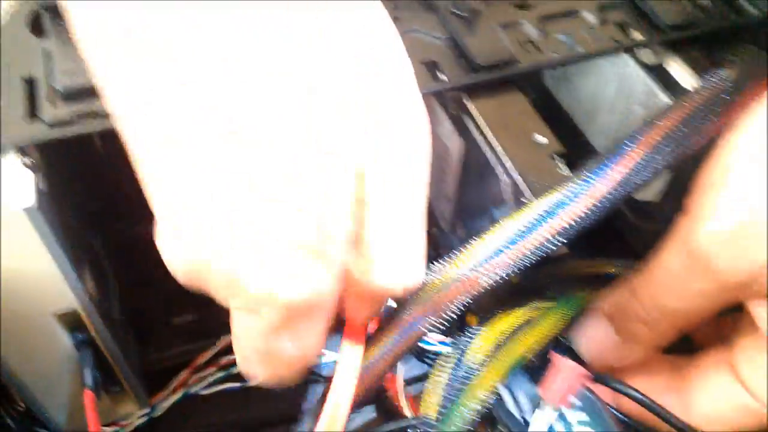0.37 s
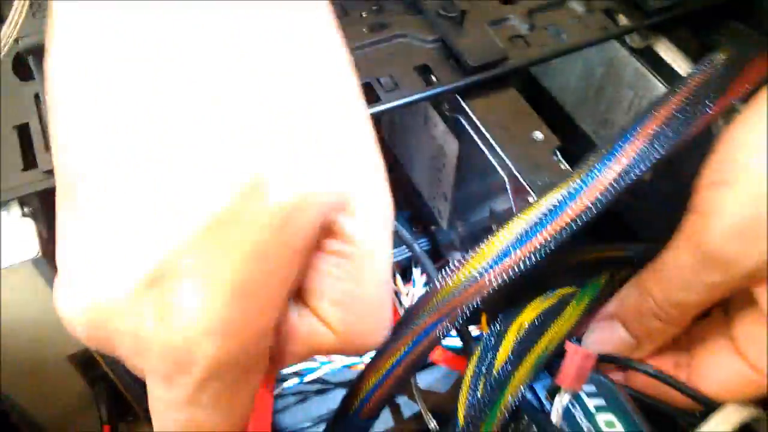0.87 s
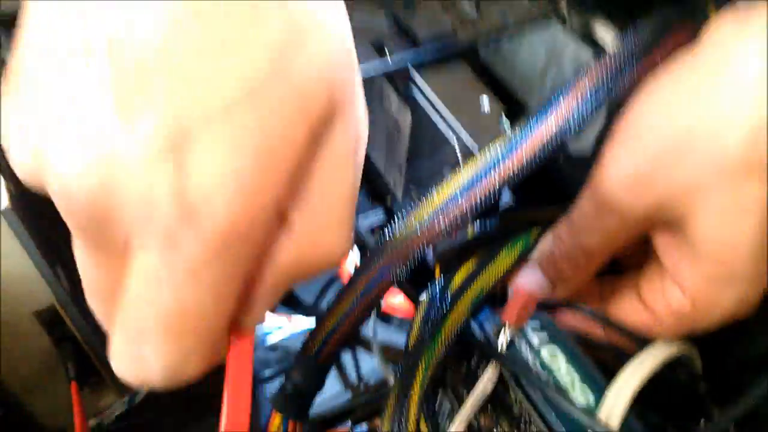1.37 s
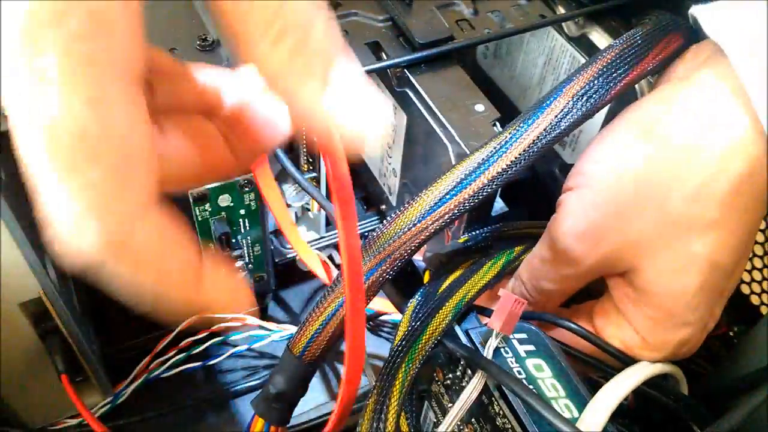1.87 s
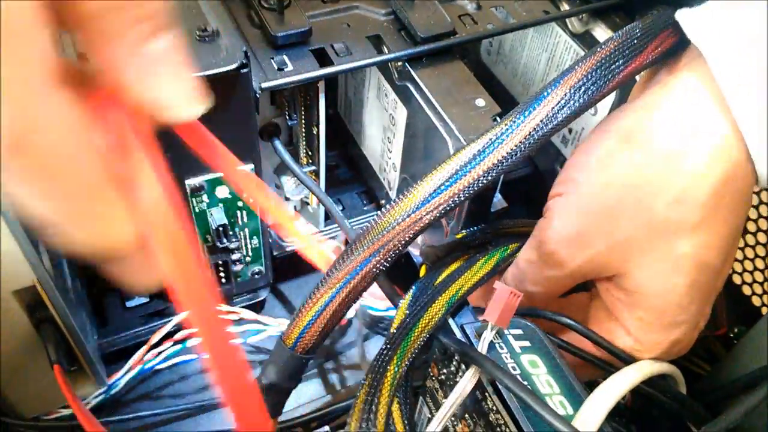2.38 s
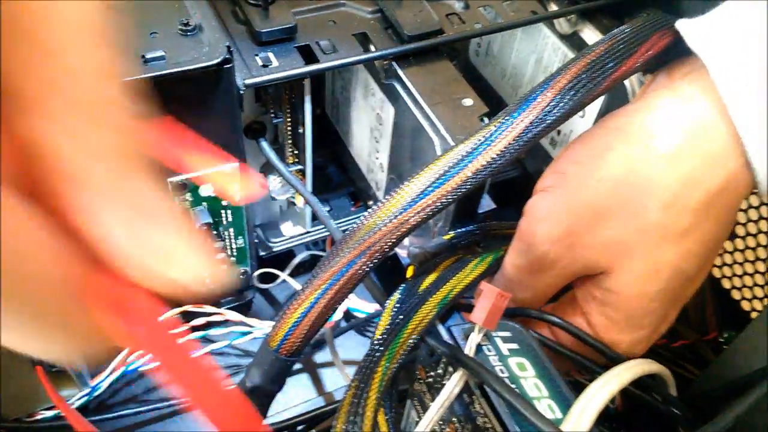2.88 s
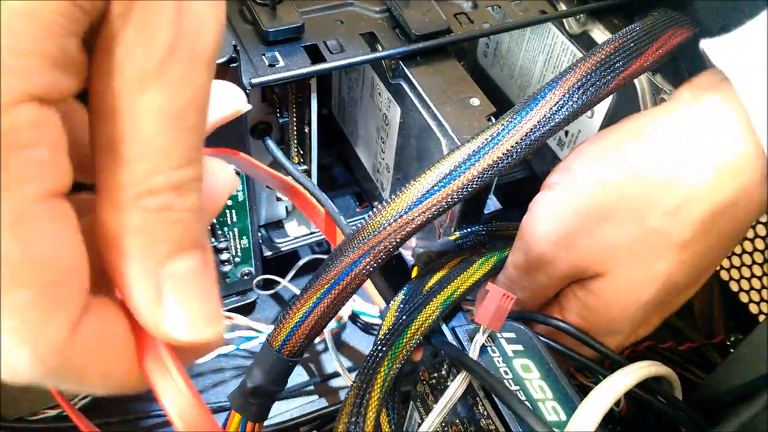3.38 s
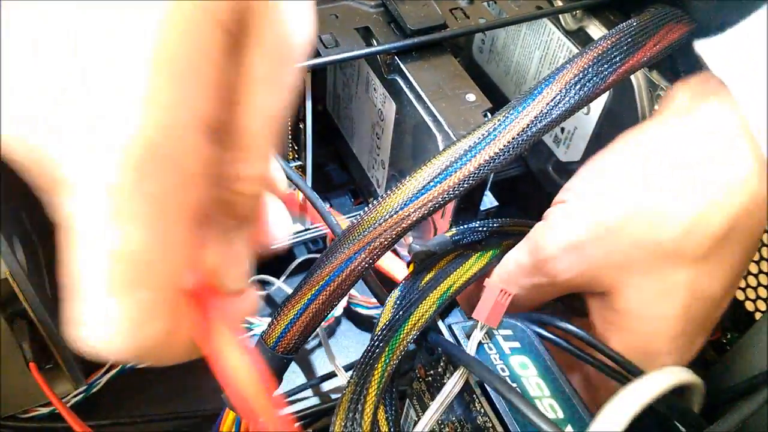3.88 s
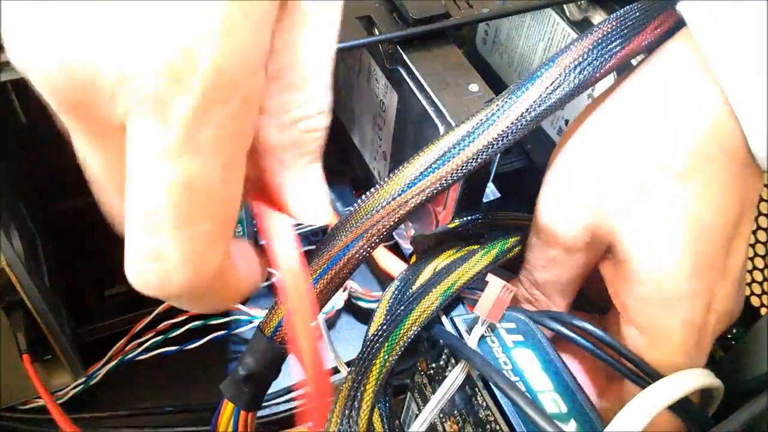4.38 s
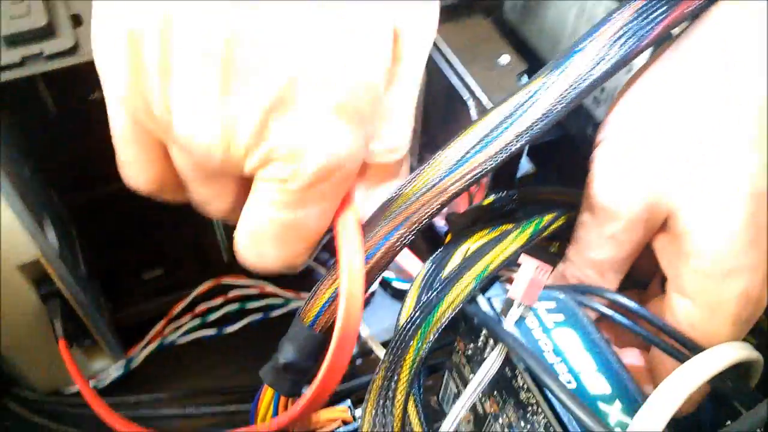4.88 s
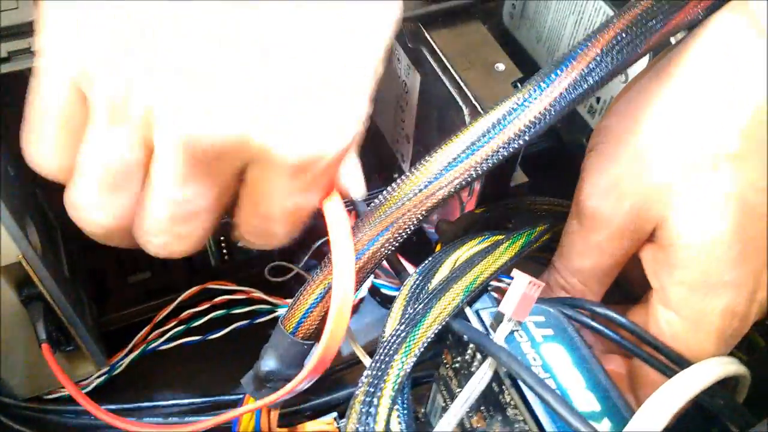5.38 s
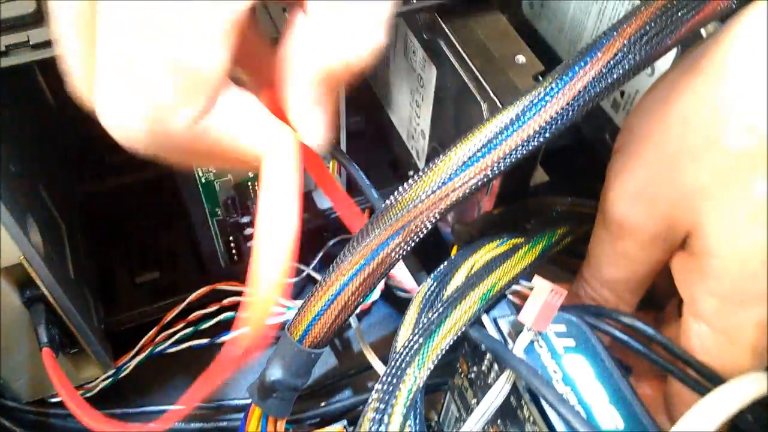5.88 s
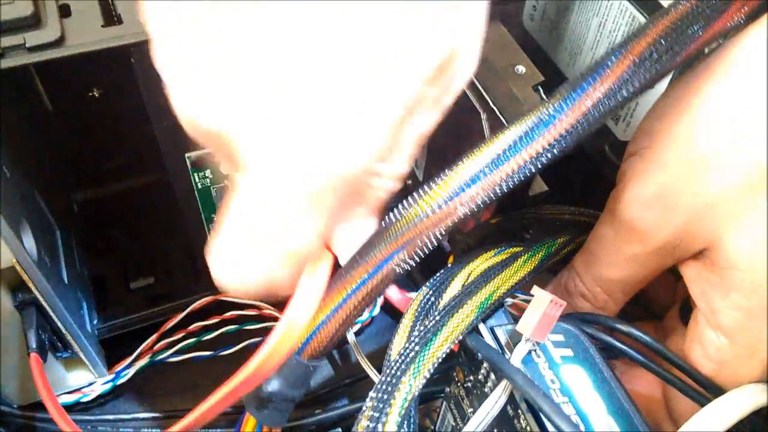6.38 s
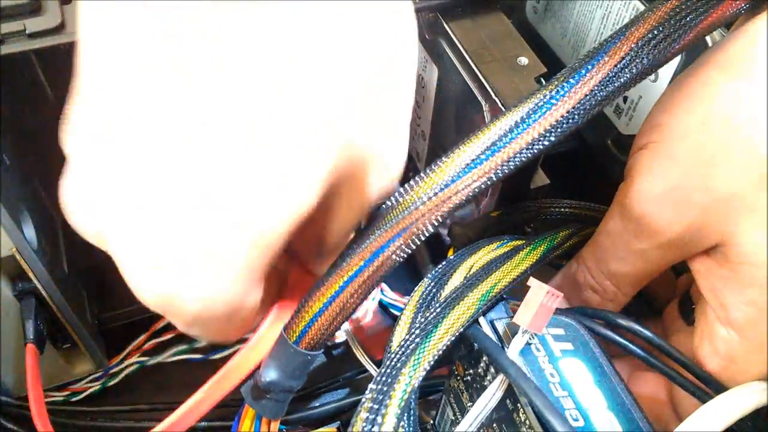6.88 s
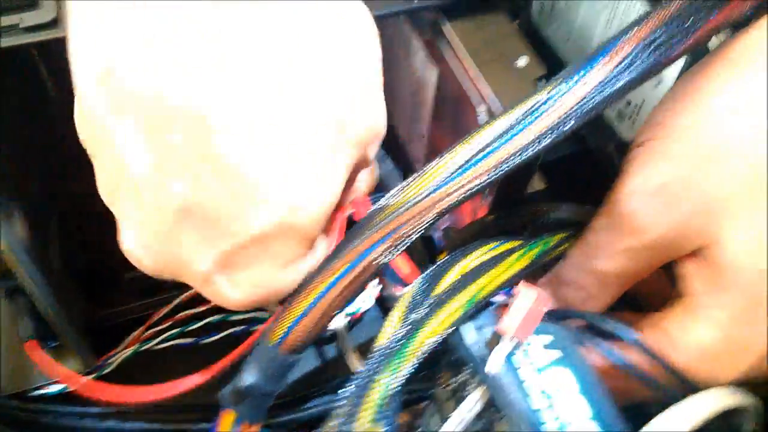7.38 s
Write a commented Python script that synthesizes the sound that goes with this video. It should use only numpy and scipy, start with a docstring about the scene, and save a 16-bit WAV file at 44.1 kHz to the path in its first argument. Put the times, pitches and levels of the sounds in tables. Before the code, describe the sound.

Cable connectors knock against sheet-metal panels in irregular bursts, each a bright click with a brief rattling ring. Woven cable sleeves brush and drag between them. Strong clacks come early in the middle, then nearly nothing but quiet ticks, rising again to a violent cluster just before the end. Dry, close indoor sound with faint hiss; the hardest hits also bump the small microphone.

```python
"""Plastic plugs tap and chatter on the panels of an open sheet-metal computer case, close to a small camera.
Each tap is a burst of noisy micro-slips that rings the panels and also jolts the camera, the harder ones far
more. Stiff cables drag over edges as clumped noise heard through the case, and sleeves brush on each other
throughout. Underneath lie a quiet room hiss of shaped noise and three thin electrical tones made of unsteady
sines."""
import sys
import numpy as np
from scipy import signal
from scipy.fft import rfft, irfft, next_fast_len
from scipy.io import wavfile
from scipy.ndimage import uniform_filter1d, map_coordinates

SR = 44100
rng = np.random.default_rng(int(sys.argv[2]) if len(sys.argv) > 2 else 0)


def ratio_of_db(decibels):
    """Turn decibels (scalar or array-like) into linear amplitude factors; 0 dB maps to 1."""
    return 10 ** (np.asarray(decibels, float) / 20)


def master_out(mix):
    """Clip the mix to full scale and print it as 16-bit PCM to the path in sys.argv[1]."""
    frames = np.transpose(np.atleast_2d(mix))
    ceiling = np.clip(frames, -1, 1)
    pcm = np.round(ceiling * 32767).astype(np.int16)
    wavfile.write(sys.argv[1], SR, pcm)


N = 330750  # 7.5 s

# Plug contacts. Each row: time in seconds, level in dB, brightest pitch in Hz, relative low knock in dB.
CONTACTS = [(.0593,-21,4360,-21),(.1426,-26,3430,-18),(.3696,-38,4000,-20),(.4105,-35,2370,-15),(.4185,-34,4060,-23),(.5916,-39,3900,-17),(.712,-47,1450,-5),(.839,-37.5,2780,-22),(.8845,-22,3850,-16),
            (1.1074,-32.5,2000,-17),(1.154,-34,4100,-28),(1.2165,-25,3980,-24),(1.241,-30,4000,-21),(1.3387,-34,2020,-20),(1.501,-41,3850,-16),(1.6785,-11.5,3900,-23),
            (1.783,-23,5540,-33),(1.7986,-24,5100,-33),(1.8325,-19,2580,-31),(2.022,-48,6500,-25),(2.0598,-46,4160,-11),(2.2205,-4.5,6040,-30),(2.3466,-23,3020,-24.5),
            (2.4105,-24,3920,-17),(2.4415,-7,2740,-32),(2.4495,-5,2670,-30.5),(2.4615,-7.5,5500,-36),(2.5245,-23,3020,-27),(2.6705,-21,3730,-30.5),(2.9415,-34,2000,-21),
            (3.102,-48,880,0),(3.172,-43,1970,-12),(3.19,-41,1570,-18),(3.2854,-50,2160,-9),(3.3475,-42,2390,-24),(3.473,-46,5940,-19),(3.585,-46,1580,-16),(3.82,-53,2500,-12),(4.0776,-51,4020,-20),
            (4.3256,-37.5,1840,-14),(4.473,-48,2750,-16),(4.552,-41,2600,-22),(4.580,-27.5,4800,-27),(4.611,-33,2540,-26),(4.6363,-25,2710,-25),(4.75,-38,4550,-21),(4.963,-48,2200,-18),(5.1776,-47,1650,-19),
            (5.3265,-28,2580,-26),(5.46,-43,3730,-17),(5.5446,-28,4210,-35),(5.5855,-33,6220,-27),(5.5946,-26,5700,-26),(5.6299,-26,3900,-19),(5.6428,-19,4440,-26),
            (5.772,-36,4500,-24),(5.984,-35,2050,-10),(6.022,-36,3960,-13),(6.0472,-35,3940,-15),(6.0693,-28,4000,-20),(6.08,-22,6200,-24),(6.0895,-20,3900,-21),(6.143,-31,1950,-10),(6.424,-35,6000,-22),
            (6.547,-34,6500,-12),(6.562,-33,2000,-10),(6.7676,-33,3850,-18),(6.9135,-11,3740,-23),(6.9328,-3,1630,-14),(6.9454,-4,5000,-24),(6.9534,-6,3800,-24),
            (7.232,-39,4500,-20),(7.393,-44,1860,-14),(7.4484,-44,4040,-20)]
# Hands on the sleeves. Each row: time in seconds, level in dB, crispness as relative treble in dB.
HANDLING = [(0, -44, -16), (.22, -52, -12), (.7, -56, -14), (1.5, -54, -15), (1.62, -66, -14),
            (2.4, -70, -14), (2.75, -62, -18), (3.1, -71, -17), (3.45, -64.5, -15), (3.65, -76, -15),
            (4.3, -73, -17), (4.75, -56, -16), (4.9, -66, -15.5), (5.1, -75.5, -14), (5.3, -59, -14),
            (5.6, -55, -7.5), (5.9, -54, -10), (6.9, -55, -8.5), (7.05, -60, -11), (7.5, -59, -11.5)]
# Broad resonances of the case. Each row: centre in Hz, width in Hz, relative level in dB.
PANEL_RESONANCES = [(830, 234, -2), (1650, 300, -7), (2050, 280, -5), (2600, 420, -5.5), (3900, 990, -4.5),
                    (5000, 605, -4.5), (5925, 700, -5.5), (8760, 3560, -18)]


def unit(x):
    """Scaled to rms 1."""
    return x / np.sqrt(np.mean(x ** 2) + 1e-20)


def along(points, hz):
    """Reads a curve of (Hz, value) points on a log frequency axis."""
    point_hz, values = np.transpose(points)
    return np.interp(np.log(hz + 1), np.log(point_hz + 1), values)


def curves(rows):
    """One value per sample for each column after the time in seconds."""
    times, *columns = np.transpose(rows)
    return [np.interp(np.arange(N) / SR, times, column) for column in columns]


def wobble(rate, size=N):
    """A smooth random curve with rate knots a second."""
    knots = rng.standard_normal(int(size * rate / SR) + 4)
    return map_coordinates(knots, [np.arange(size) * rate / SR])


def filtered(x, response):
    """Multiplies the spectrum of x by a complex response of frequency."""
    size = x.shape[-1]
    padded = next_fast_len(size + 4096)
    return irfft(rfft(x, padded) * response(np.fft.rfftfreq(padded, 1 / SR)), padded)[..., :size]


def ports(pair, alike):
    """Mixes two unrelated signals into left and right microphone signals, alike by a share set per frequency."""
    def mid_and_side(hz):
        turn = np.arccos(np.clip(along(alike, hz), -1, 1)) / 2
        return np.array([np.cos(turn), np.sin(turn)])

    mid, side = filtered(pair, mid_and_side)
    return np.array([mid + side, mid - side])


def resonances(table, hz):
    """Sum of resonators (centre Hz, width Hz, dB), every other one in opposite polarity."""
    return sum((-1) ** k * ratio_of_db(db) * 1j * hz * width / (centre * centre - hz * hz + 1j * hz * width)
               for k, (centre, width, db) in enumerate(table))


def background():
    """Room and electronics hiss as shaped noise, with three thin tones of slightly unsteady level and phase."""
    # Colour of the hiss. Each row: frequency in Hz, relative density in dB per Hz.
    hiss_colour = [(71, -66), (120, -26), (720, -1), (971, -11), (1030, -3.5), (1360, -8), (3400, -6),
                   (6300, -12), (7200, -18), (9980, -20), (13200, -26), (14000, -42.5)]
    # Electrical tones. Each row: frequency in Hz, peak level in dB.
    thin_tones = [(1066, -78), (10971, -94.5), (12947, -88)]
    t = np.arange(N) / SR
    hiss = unit(filtered(rng.standard_normal((2, N)), lambda hz: ratio_of_db(along(hiss_colour, hz))))
    wide_hiss = ports(hiss, [(200, .45), (1600, .1), (10000, .3)])  # (Hz, left-right likeness)
    tones = 0
    for hz, db in thin_tones:
        tones = tones + ratio_of_db(db + 1.3 * wobble(8.7)) * np.sin(2 * np.pi * hz * t + 0.89 * wobble(21))
    hiss_db = -66.5
    return ratio_of_db(hiss_db + 0.83 * wobble(1.3)) * wide_hiss + tones


def slips(size):
    """Woven sleeve catching and letting go: noise in clumps of several sizes, in patches of changing pitch."""
    clumps_db = 1.1 * wobble(35, size=size) + 1.5 * wobble(140, size=size) + 2.3 * wobble(900, size=size)
    spectra = signal.stft(ratio_of_db(clumps_db) * rng.standard_normal((2, size)), nperseg=256)[2]
    patches = rng.standard_normal(spectra.shape[1:])
    patches = uniform_filter1d(patches, size=6, axis=0)  # over frequency
    patches = uniform_filter1d(patches, size=10, axis=1)  # over time
    return unit(signal.istft(spectra * ratio_of_db(2.5 * unit(patches)), nperseg=256)[1][:, :size])


def settling():
    """Amplitude of the shifting cables after every tap: the power of the taps adds up and dies away."""
    under_tap_db, t60_s = -39, .55
    power = np.zeros(N)
    keep = ratio_of_db(-120 / t60_s / SR)  # share of power left after one sample
    for s, db, *_ in CONTACTS:
        power[round(s * SR)] = ratio_of_db(2 * (db + under_tap_db))
    return np.sqrt(signal.lfilter([1], [1, -keep], power))


def rubbing():
    """Sleeves and fingers brush on each other all the while, coloured by cloth and case; crispness sets the treble."""
    # Colour of the sleeves. Each row: frequency in Hz, relative density in dB per Hz.
    sleeve_colour = [(88, -49.5), (150, -20), (460, 2), (844, -5), (1140, -5.5), (1940, -2), (2950, -5.5),
                     (4000, -3), (6400, -11.5), (7300, -19), (12500, -28), (14000, -44.5)]
    level_db, treble_db = curves(HANDLING)
    brush = ratio_of_db(1.2 * wobble(10)) * slips(size=N)

    def colour(hz):
        return ratio_of_db(along(sleeve_colour, hz)) * (.6 + np.abs(resonances(PANEL_RESONANCES, hz)))

    # split at 7 kHz
    low = filtered(brush, lambda hz: colour(hz) / (1 + (hz / 7000) ** 8))
    high = filtered(brush, lambda hz: colour(hz) / (1 + (7000 / (hz + 1)) ** 8))
    return (ratio_of_db(level_db) + settling()) * (unit(low) + ratio_of_db(treble_db) * unit(high))


def treble(s, bright_hz):
    """Relative treble in dB of a contact: higher for small bright contacts and crisp handling."""
    base_db, db_per_octave, follows_crispness = -23, 5, 1.5  # base holds at 3.5 kHz and -14 dB crispness
    times, _, crisp_db = np.transpose(HANDLING)
    pitch_db = db_per_octave * np.log2(bright_hz / 3500)
    return base_db + pitch_db + follows_crispness * (np.interp(s, times, crisp_db) + 14)


def contact(bright_hz, knock_db, treble_db, modes_db=0):
    """The case from one point of contact: modes near the brightest pitch ring most, all at new strengths."""
    # Longest-ringing panel modes. Each row: centre in Hz, width in Hz, relative level in dB.
    long_modes = [(452, 16, -13), (880, 40, -11), (1221, 30, -10), (1630, 30, -8.5), (2010, 40, -8),
                  (2662, 40, -8), (3760, 50, -8), (4360, 50, -8), (5860, 60, -11)]
    chance_db = 3 * rng.standard_normal(len(long_modes))

    def near(hz):
        return np.exp(-(np.log((hz + 1) / bright_hz) / .15) ** 2)

    modes = [(centre, width, db - 2 + modes_db + luck_db + 6 * near(centre))
             for (centre, width, db), luck_db in zip(long_modes, chance_db)]
    broad = [(centre, width, db + 2.5 * rng.standard_normal()) for centre, width, db in PANEL_RESONANCES]
    tilt = [(100, knock_db - 4), (250, knock_db + 19), (900, knock_db + 18), (1600, -0.5), (6400, 0),
            (7500, treble_db + 18.5), (13000, treble_db + 19), (15500, -40)]  # (Hz, dB)

    def response(hz):
        body = resonances(broad, hz) * (1 + .8 * near(hz)) + 1.1 * resonances(modes, hz)
        return body * ratio_of_db(along(tilt, hz))

    return response


def strokes():
    """Cables dragged over edges: each rasp of slips swells and fades in dB and sounds through the case."""
    # Drags. Each row: strongest moment in seconds, rms level there in dB, seconds to swell by 20 dB,
    # seconds to fade by 20 dB, brightest pitch in Hz.
    drags = [(.068, -29, .09, 0.11, 4050), (.15, -36, .04, .06, 3600), (.4, -47, 0.23, 0.2, 4000),
             (.72, -48, .02, .15, 900), (.884, -39.5, 0.01, 0.11, 2500), (1.33, -46, 0.3, 0.25, 2000),
             (1.8, -29, 0.055, 0.03, 5530), (2.44, -27, 0.075, 0.0746, 3000), (2.68, -30, .004, .15, 4000),
             (2.835, -41, .05, 0.06, 4500), (3.84, -64, .03, .3, 4000), (4.1, -62, .05, .2, 3900),
             (4.415, -53, 0.1, 0.06, 6000), (4.6, -37, 0.03, 0.11, 5800), (5.28, -47, .09, 0.2, 3000),
             (5.335, -45, .006, .09, 452), (5.77, -41, 0.2, 0.1, 4400), (6.088, -32, 0.05, 0.07, 5800),
             (6.42, -46, .06, 0.12, 4240), (6.575, -41, .04, .06, 2000), (6.785, -45, .02, .2, 3900),
             (6.94, -19, 0.045, .05, 3000), (7.235, -44, 0.06, 0.1, 5000)]
    extra_treble_db, extra_modes_db = 4, 3.5  # over a tap; a drag keeps feeding the long modes
    lead = SR // 6  # samples ahead of the strongest moment
    out = np.zeros((2, N + SR))
    t = (np.arange(SR // 2) - lead) / SR
    for s, db, swell, fade, bright_hz in drags:
        treble_db = treble(s, bright_hz) + extra_treble_db
        # a duller drag presses on a larger area and moves the low modes more
        knock_db = -19 + 7 * np.log2(3000 / bright_hz)
        rasp = unit(filtered(slips(size=len(t)), contact(bright_hz, knock_db, treble_db, extra_modes_db)))
        envelope_db = db - 20 * np.where(t < 0, -t / swell, t / fade)
        out[:, round(s * SR):][:, :len(t)] += rasp * ratio_of_db(envelope_db)
    return out[:, lead:][:, :N]


def ring(size):
    """A fresh draw of the panels' dense modes as noise, each dying at the speed of its frequency."""
    # Decay of the dense modes. Each row: frequency in Hz, t60 in seconds.
    mode_decay = [(300, .5), (800, .4), (2000, .3), (5500, .2), (11000, .1)]
    hz, t, spectra = signal.stft(rng.standard_normal((2, size)), SR, nperseg=128)
    decay = ratio_of_db(-60 * t / along(mode_decay, hz)[:, None])
    tail = signal.istft(spectra * decay, SR, nperseg=128)[1][:, :size]
    return tail / np.linalg.norm(tail[0])


def taps():
    """Each contact is a click and a dying chatter of micro-slips; both ring the panels and jolt the camera."""
    damping_s, damping_s_per_db = .105, .0022  # t60 of the damping at -30 dB; harder taps ring longer
    held_s, held_loss = .045, .65  # a plug that soon touches again loses up to this share of its t60
    out, jolts = np.zeros((2, N + SR)), np.zeros(N)
    t = np.arange(SR // 5) / SR
    gaps = np.diff([row[0] for row in CONTACTS], append=N / SR)
    for (s, db, bright_hz, knock_db), gap in zip(CONTACTS, gaps):
        start = round(s * SR)
        free_t60 = damping_s + damping_s_per_db * (db + 30)
        t60 = max(free_t60 * (1 - held_loss * np.exp(-gap / held_s)), 1 / 100)
        rattle = .05 * t60  # a plug held firmly neither rattles nor rings for long
        catches = rng.standard_normal((2, len(t))) * ratio_of_db(4.9 * rng.standard_normal(len(t)))
        chatter = catches * (1 - np.exp(-t / (.25 * rattle))) * np.exp(-t / rattle)
        chatter /= np.linalg.norm(chatter[0])
        damped = ring(size=len(t)) * ratio_of_db(-60 * t / t60)
        damped /= np.linalg.norm(damped[0])
        struck = signal.fftconvolve(chatter, damped, axes=1)[:, :len(t)] + .6 * chatter
        struck = filtered(struck, contact(bright_hz, knock_db, treble(s, bright_hz)))
        struck /= np.linalg.norm(struck[0])
        # a longer ring gets more energy, so that its peak stays up
        out[:, start:][:, :len(t)] += ratio_of_db(db - 16) * np.sqrt(t60 * SR) * struck
        jolts[start] = ratio_of_db(1.2 * db + knock_db + 23)  # grows faster than the tap itself
    thumps = filtered(jolts, lambda hz: 1j * hz / (110 + 1j * hz) / (1 + 1j * hz / 200) ** 2)
    return out[:, :N], thumps


def scene():
    """Airborne sounds lose their bass in the small microphone; jolts come through its body."""
    # Likeness of the channels. Each row: frequency in Hz, left-right likeness from 0 to 1.
    likeness = [(200, 0.61), (700, 0.44), (2500, .25), (10000, .1)]
    # Place of the hands. Each row: time in seconds, left over right in dB.
    hands_place = [(0, 1), (.7, -1), (2.7, 1), (3.8, -0.8), (5, 1.3), (6, 2), (7.5, 1)]
    clicks, jolts = taps()
    balance = ratio_of_db(np.outer([.5, -.5], curves(hands_place)[0]))
    hands = ports(clicks + strokes() + rubbing(), likeness) * balance
    thin = filtered(hands + background(), lambda hz: (1j * hz / (120 + 1j * hz)) ** 2)
    return thin + jolts * ratio_of_db([[1.5], [-1.5]])  # dB, left and right


def low_pass(x):
    """Removes everything above the highest recorded frequency."""
    return signal.sosfilt(signal.butter(12, 15700, fs=SR, output="sos"), x)


def record(dry):
    """The loudest peaks are squeezed softly under the input's ceiling, and the top treble is rolled off."""
    ceiling = 0.7
    squeezed = dry / (1 + np.abs(dry / ceiling) ** 4) ** (1 / 4)
    soft = filtered(squeezed, lambda hz: 1 / (1 + (hz / 14900) ** 24))
    return low_pass(soft)


dry = scene()
out = record(dry)
master_out(out)
```